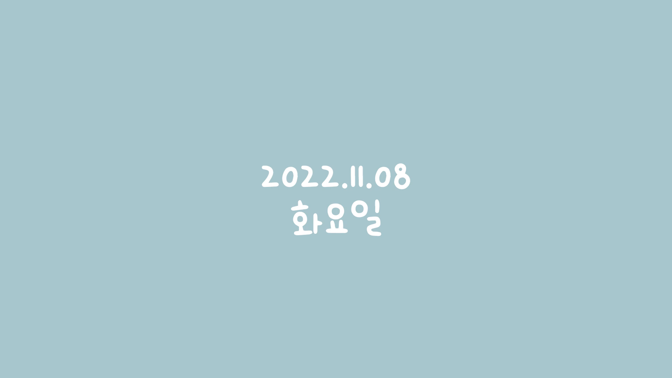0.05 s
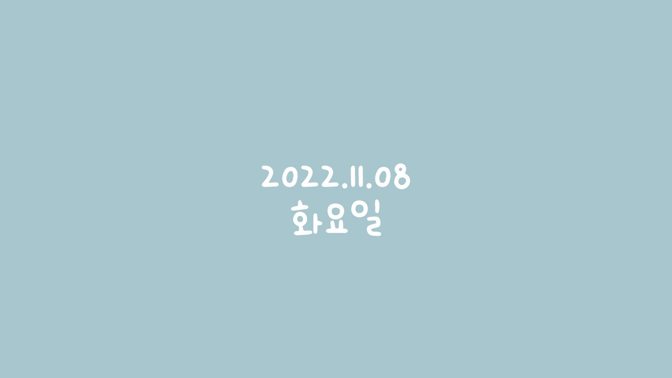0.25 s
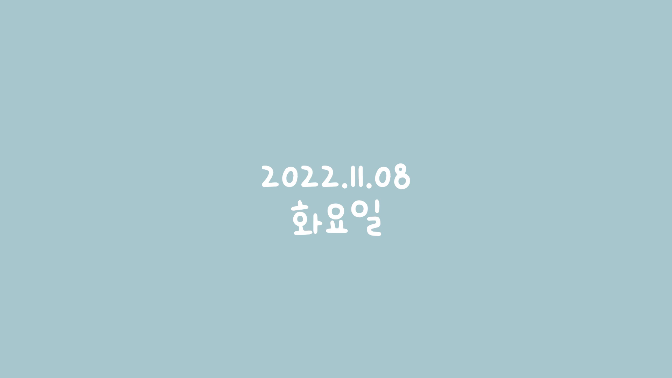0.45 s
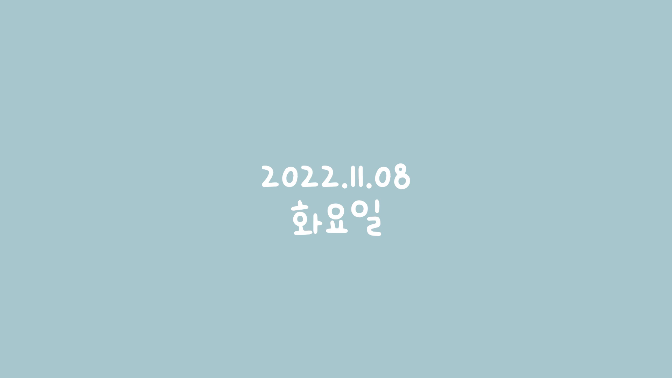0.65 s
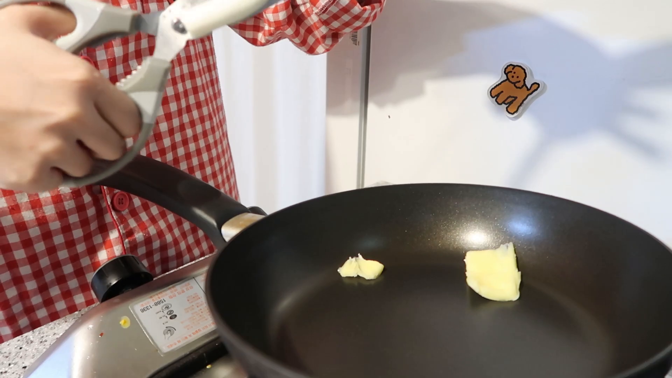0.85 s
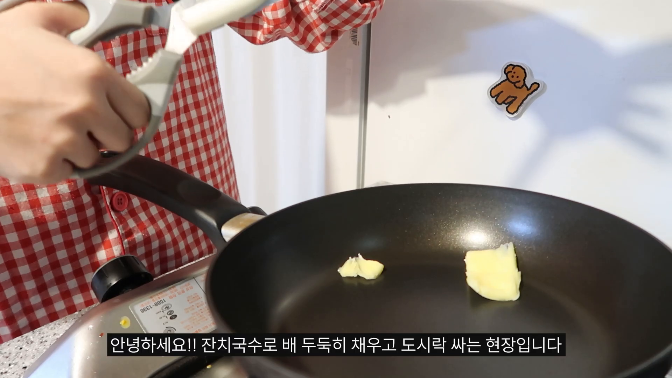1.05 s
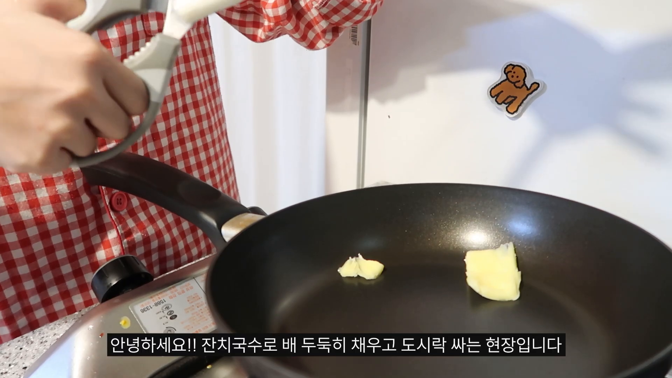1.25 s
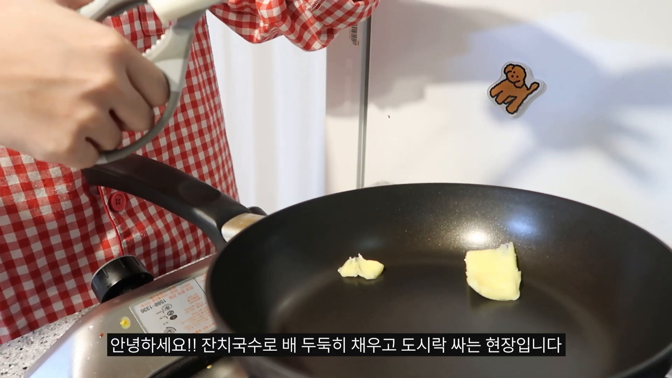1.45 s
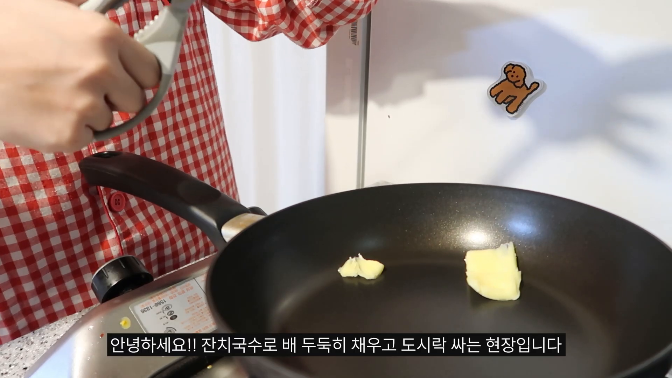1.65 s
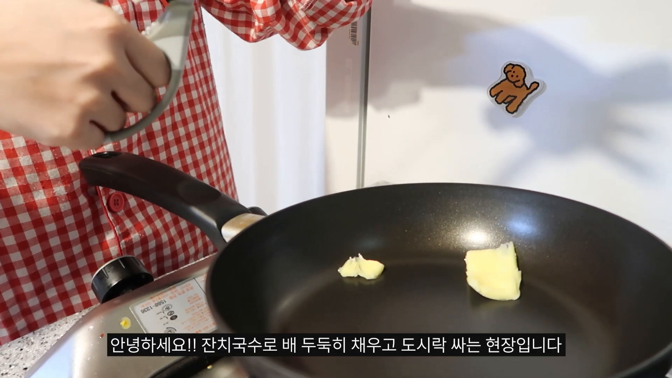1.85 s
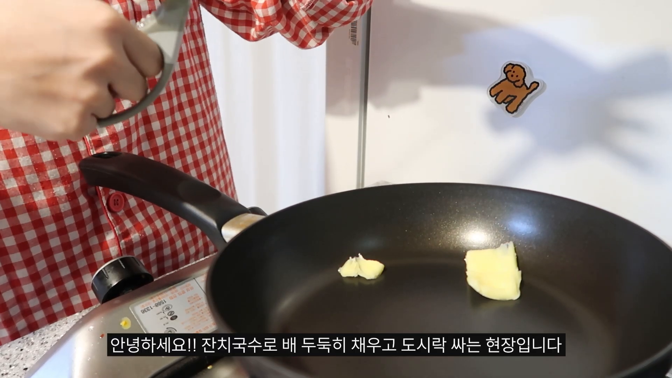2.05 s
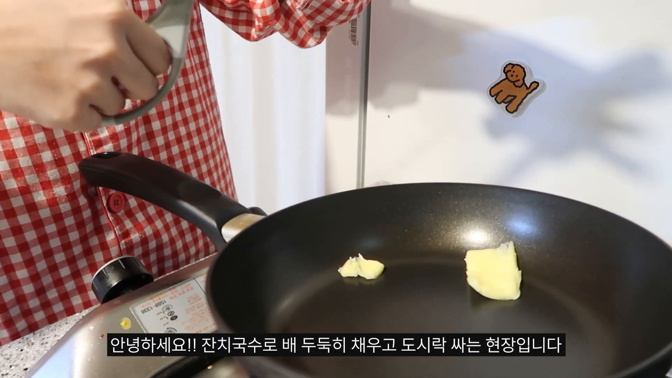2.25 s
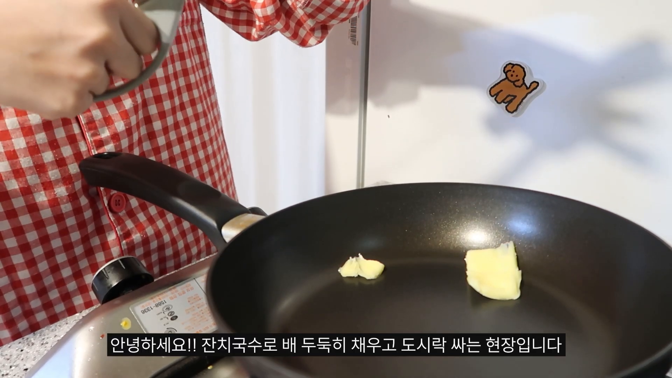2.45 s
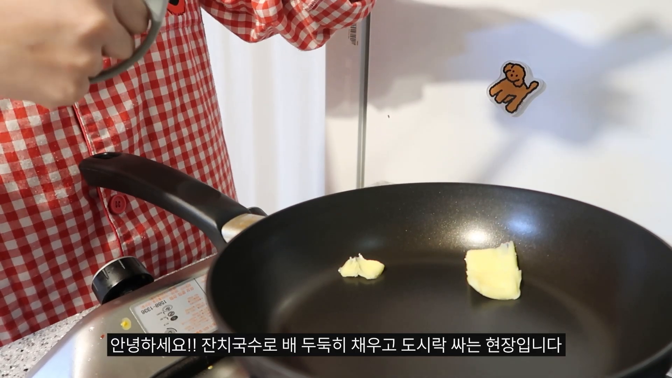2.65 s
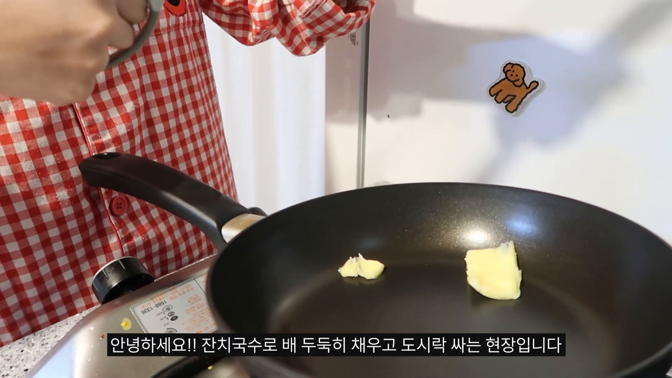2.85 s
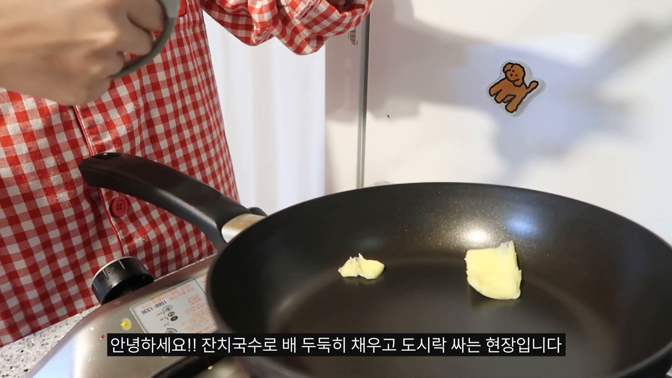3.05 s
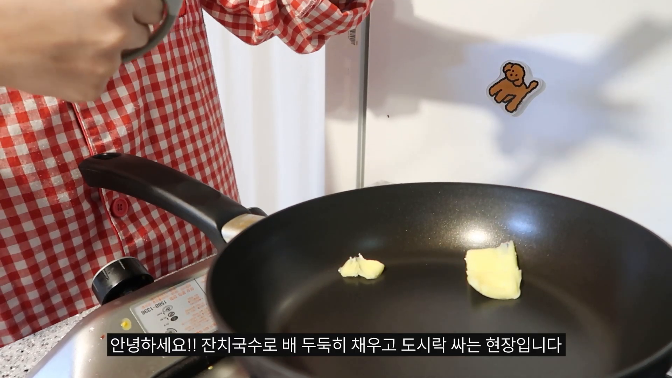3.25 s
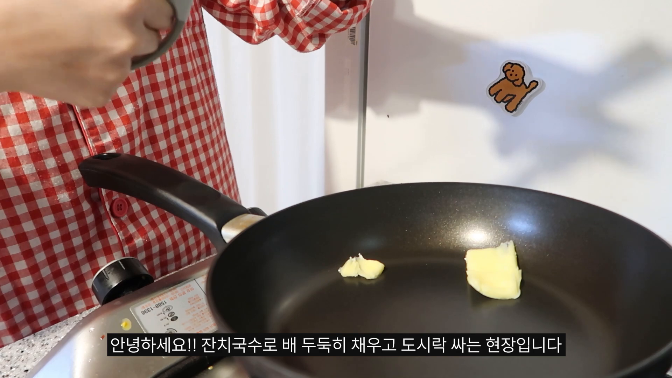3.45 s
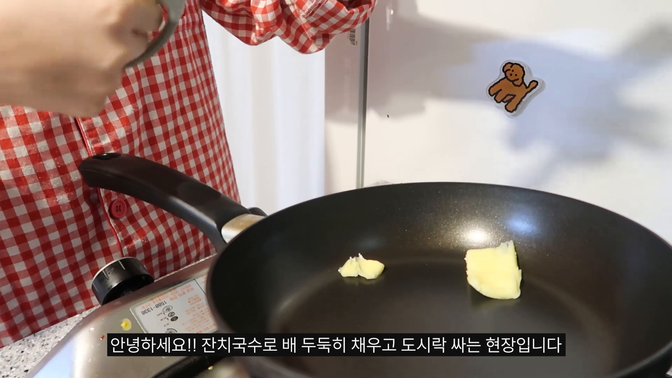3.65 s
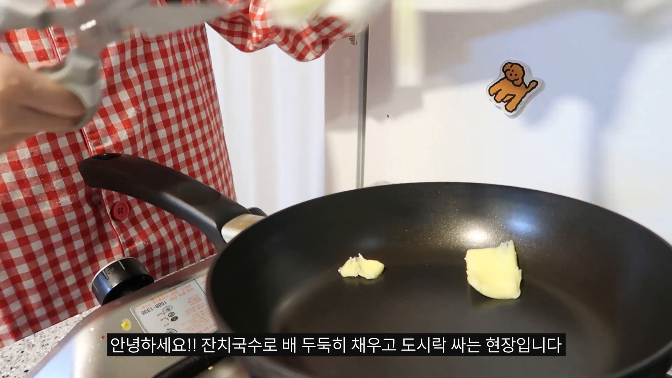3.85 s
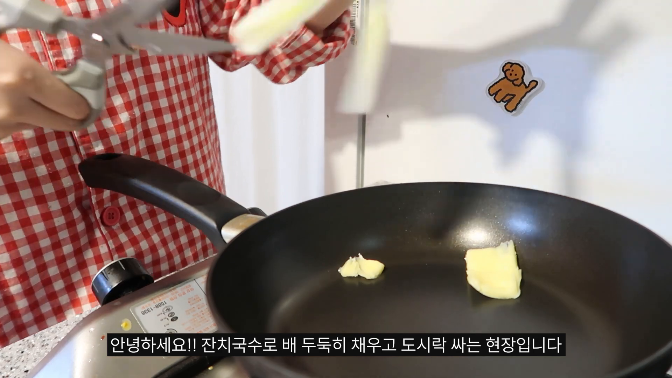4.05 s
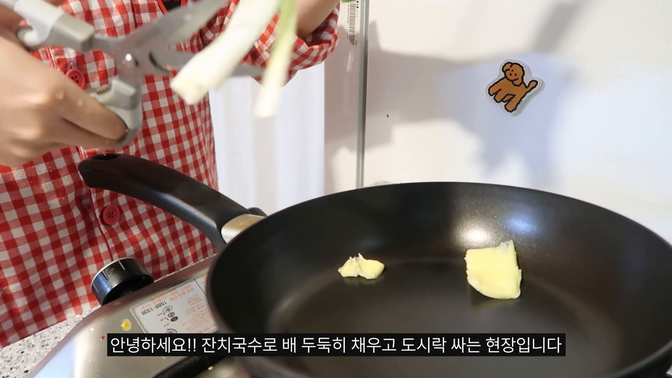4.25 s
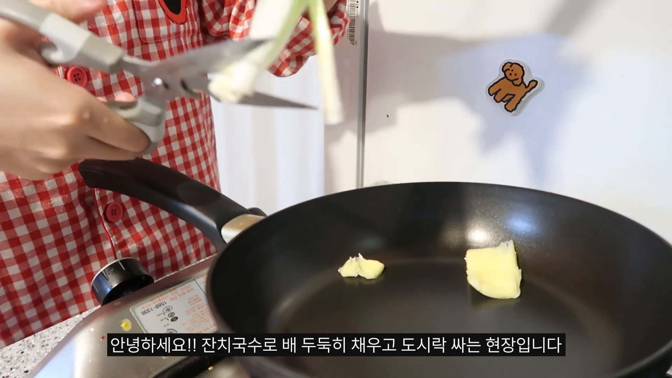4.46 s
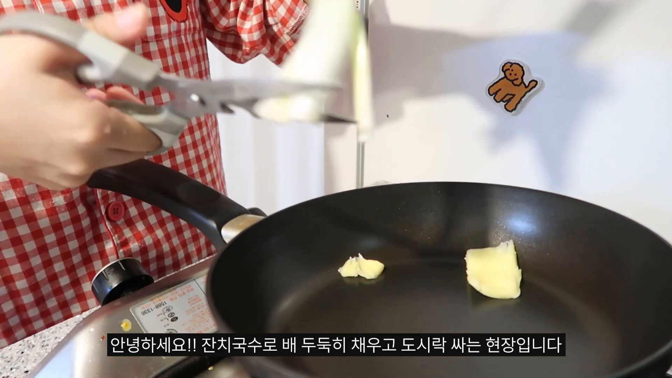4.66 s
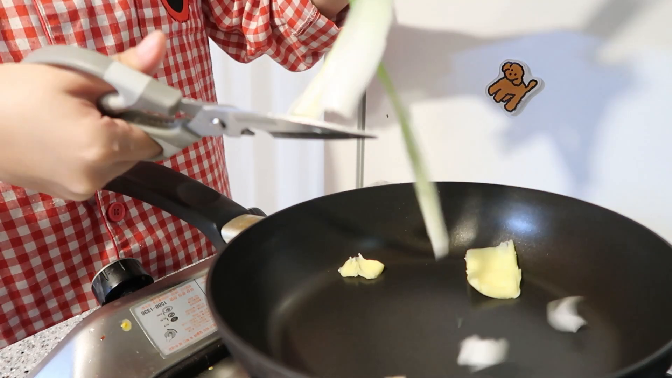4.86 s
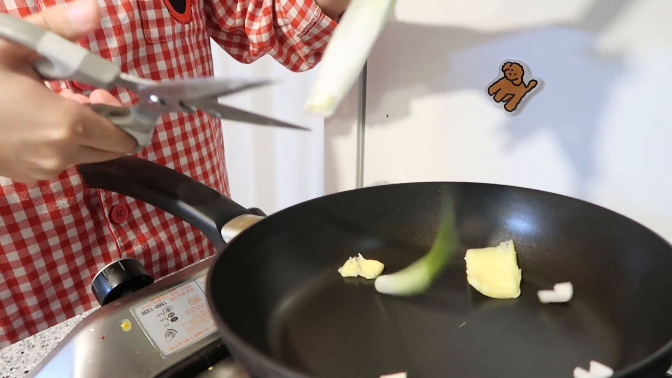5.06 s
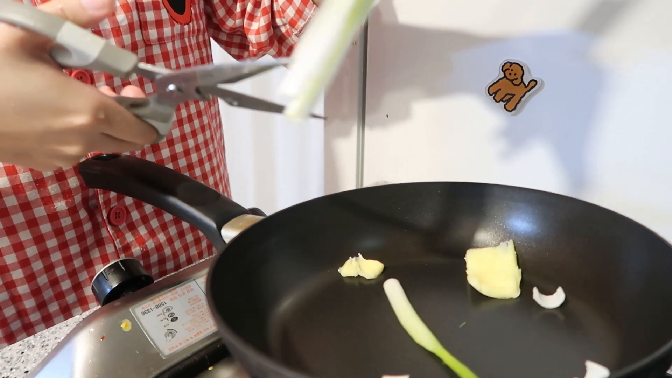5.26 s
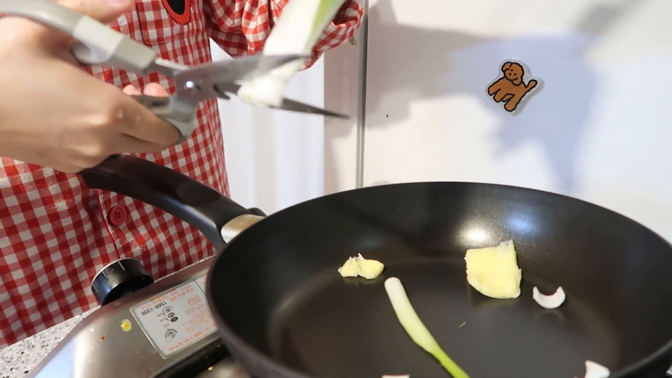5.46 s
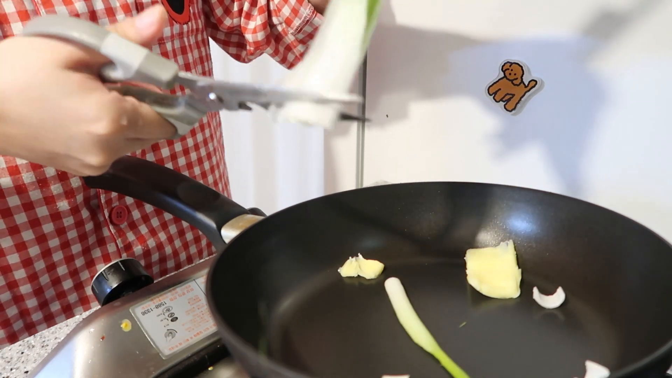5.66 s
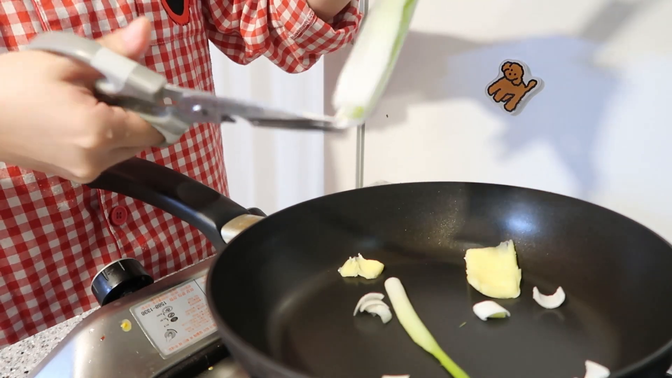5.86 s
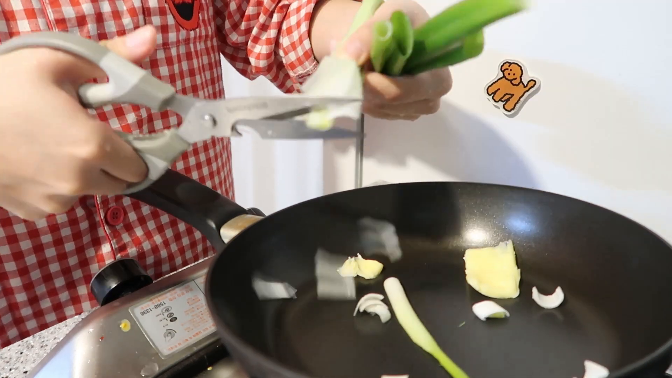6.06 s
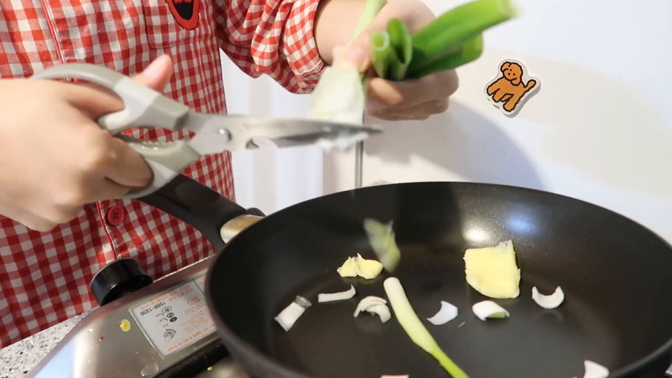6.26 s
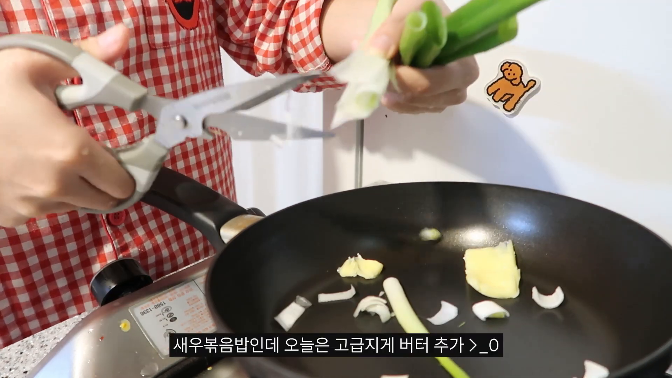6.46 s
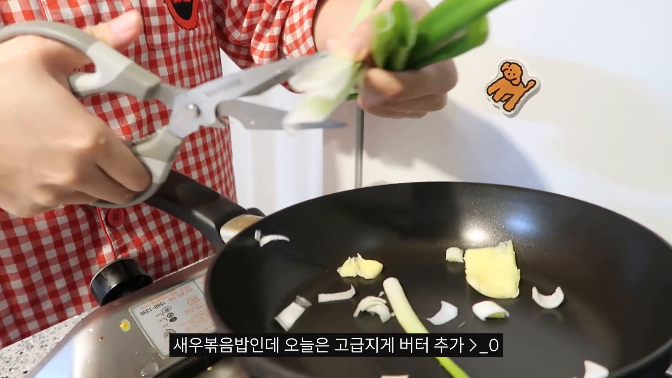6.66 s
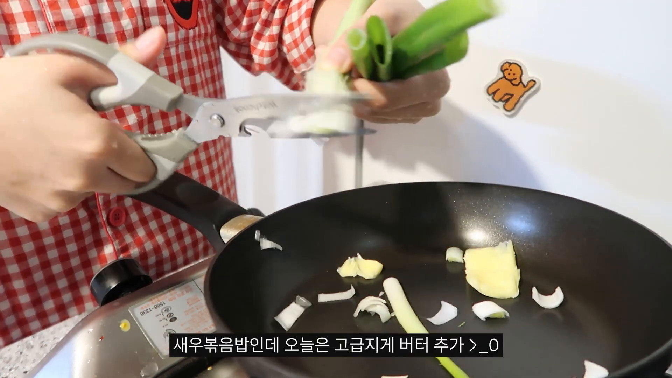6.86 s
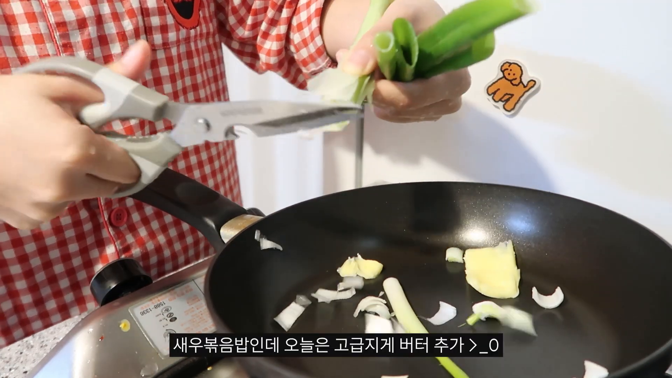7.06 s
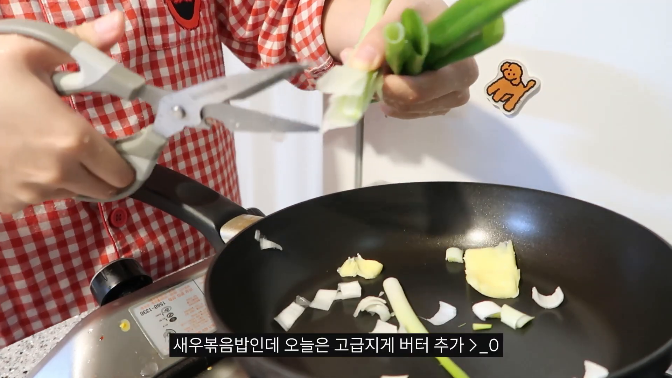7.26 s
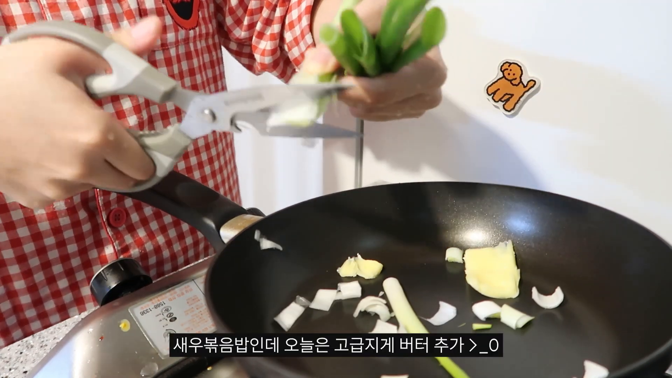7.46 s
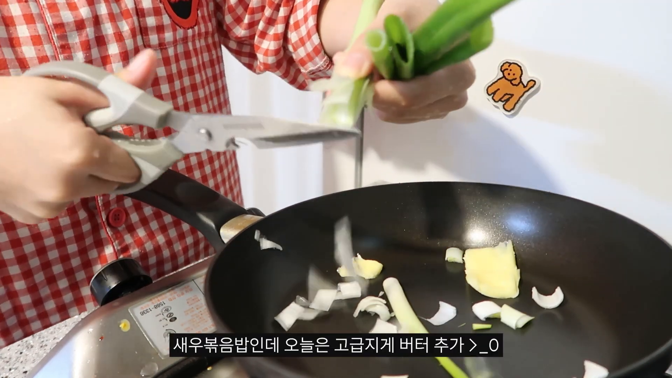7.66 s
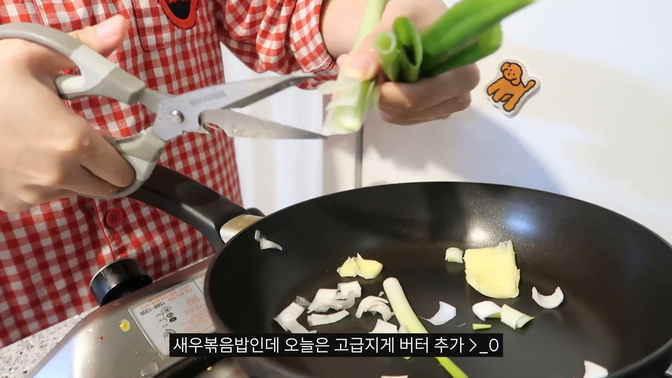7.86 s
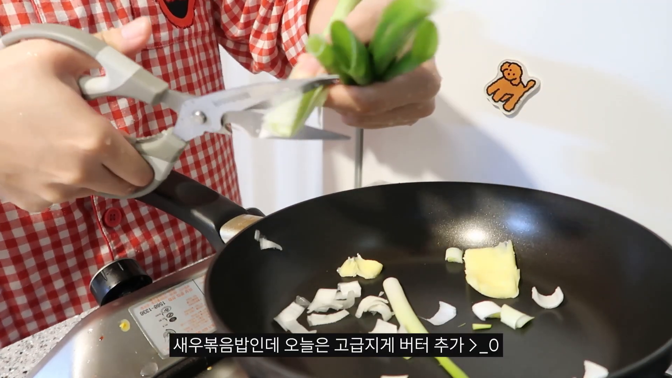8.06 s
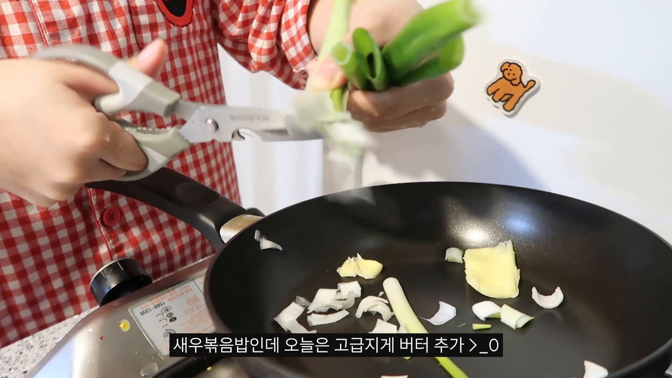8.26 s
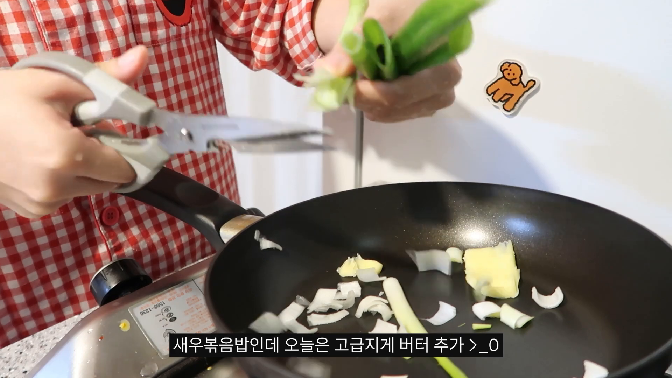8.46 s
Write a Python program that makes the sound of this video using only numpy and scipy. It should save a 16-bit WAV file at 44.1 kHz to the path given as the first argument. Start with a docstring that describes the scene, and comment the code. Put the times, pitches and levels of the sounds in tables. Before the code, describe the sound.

Silence until about 0.75 s, then a quiet kitchen fades in over a second: low rumble and very faint appliance whines. Scissors work close to a stereo microphone on fresh green onion. Short, wet, gritty crunches with sharp fibre snaps come at 1.2, 1.65, 2.1 and 2.5 s, with soft stalk rustles between them. A harder crunch runs from 3.3 s to a loud crack near 3.7 s. Light rustling and small ticks follow until a crisp snip at 4.8 s, its blades faintly ringing; pieces hit the frying pan around 5.0 s with a low, soft thump, and a smaller one at 5.35 s. More snips at 5.8, 6.35, 7.0, 7.65 and 8.35 s; bits tap and patter in the pan, notably at 5.9 and 7.15 s, more faintly at 7.8 and 8.5 s. Short, bright room reflections surround everything.

```python
"""Kitchen scissors cut green onion, heard at two close ports after an initial silence.
A low rumble and faint whines, shaped noise, fade in; stalks tear and rustle as dense trains of breaks,
and from 1.1 s fibres snap as short, noisy wave packets. From 4.9 s the closing blades hum as one mode
and the pieces land in a frying pan, whose modes ring, with thumps of low damped modes.
Decaying random taps add the kitchen's echo to onion, blades and pan."""
import sys
import numpy as np
from scipy import signal
from scipy.fft import rfft, irfft, next_fast_len
from scipy.io import wavfile
from scipy.ndimage import uniform_filter1d

SR = 44100
rng = np.random.default_rng(int(sys.argv[2]) if len(sys.argv) > 2 else 0)


def to_wav(sig):
    """Store sig (one row per channel, or 1-D mono) as 16-bit WAV at the path in sys.argv[1].

    Samples outside -1..1 are clipped; the rate is SR.
    """
    pcm = np.clip(np.atleast_2d(sig), -1, 1) * 32767
    pcm = np.round(pcm).astype(np.int16)
    wavfile.write(sys.argv[1], SR, pcm.T)  # frames by channels


N = 375291


def gain_of(db):
    """Logarithmic level: decibels to amplitude."""
    return 10 ** (np.asarray(db) / 20)


def evened(x):
    """Power normalisation: scales to rms 1."""
    return x / np.sqrt(np.mean(x ** 2) + 1e-20)


def read(points, hz):
    """Logarithmic pitch scale: interpolates a table along log frequency."""
    f, value = np.transpose(points)
    return np.interp(np.log(hz + 1), np.log(f + 1), value)


def add(mix, s, sound):
    """Superposition: mixes a sound in at s seconds, cut at the end of the mix."""
    part = mix[round(s * SR):][:len(sound)]
    part += sound[:len(part)]


def colour(x, points):
    """Minimum-phase filtering: a causal response with the spectrum of a table."""
    log_gain = np.log(gain_of(read(points, abs(np.fft.fftfreq(2048, 1 / SR)))))
    taps = np.fft.ifft(np.exp(np.conj(signal.hilbert(log_gain)))).real[:1024]
    return signal.oaconvolve(x, taps)[:len(x)]


def ring(hz, t60, t):
    """Damped oscillation: one mode falls 60 dB in t60 seconds."""
    return gain_of(-60 * t / t60) * np.sin(2 * np.pi * hz * t)


def cracks(per_s, spread_db):
    """Random point process: tiny breaks of either sign, a few of them large."""
    size = gain_of(spread_db * np.minimum(rng.exponential(1, N), 4)) * rng.choice([-1, 1], N)
    return size * (rng.random(N) < per_s / SR)


# Spectrum of the room's rumble: f/Hz, relative level/dB
RUMBLE = [(12, -49), (20, -27), (101, -0.5), (193, -9.5), (319, -8.5), (399, -11.5), (1480, -21),
          (2910, -23.5), (3440, -26), (13200, -38.5), (16000, -75)]
RUMBLE_DB = -43.5
# Appliances that whine: f/Hz, width between the -6 dB points/Hz, level/dB
WHINES = [(56.8, 16, -49.5), (99, 27, -53.5), (328, 12, -55.5), (820.3, 13, -59.5), (2837, 15, -61.5),
          (3910, 30, -63)]
WAVER_DB = 1.2  # rms, where the whines make up all the power
# Left-right correlation of the room tone: f/Hz, correlation (1 alike, negative opposed)
LIKENESS = [(110, 1), (200, 0.7), (950, 0.32), (3770, 0.17), (15000, -0.77)]


def room_tone():
    """Spectral synthesis of noise: random short-time spectra, with narrow humps for the appliances."""
    frames, hz = N // 1024 + 5, np.fft.rfftfreq(4096, 1 / SR)
    a, b, c, d, patches = rng.standard_normal((frames, len(hz), 5)).T
    patches = uniform_filter1d(uniform_filter1d(patches, size=40, axis=0), size=4, axis=1)
    patches = evened(patches)
    same = np.clip(read(LIKENESS, hz), -1, 1)[:, None]
    left = a + 1j * b
    right = same * left + np.sqrt(1 - same ** 2) * (c + 1j * d)
    spectra = np.array([left, right]) * gain_of(0.5 * patches)  # faint patches

    shapes = [(read(RUMBLE, hz), RUMBLE_DB)]
    shapes += [(-20 * np.log10(1 + (2 * (hz - f) / width) ** 2), db) for f, width, db in WHINES]
    # each shape is scaled to its own level before the powers add
    powers = [gain_of(2 * (shape + db)) / gain_of(2 * shape).sum() for shape, db in shapes]
    power = sum(powers)

    # the whines come and go
    whining = 1 - powers[0] / power
    waver = uniform_filter1d(rng.standard_normal((frames, 1)) + patches.T, size=12, axis=0)
    spectra *= gain_of(WAVER_DB * whining[:, None] * evened(waver).T)
    tone = signal.istft(spectra * np.sqrt(power)[:, None], nperseg=4096, noverlap=3072)[1][:, :N]
    return evened(tone) * np.sqrt(power.sum())


# Strokes through the stalks: start t/s, length/s, force at start/dB, force at end/dB,
# release of force/(dB/s), fizz of wet cells over the force/dB
STROKES = [(0.758, 0.011, -24, -33, 262, -11), (1.162, 0.052, -32.5, -31.5, 400, -6),
           (1.609, 0.0045, -34.5, -48, 550, -11), (1.656, 0.064, -35, -32.5, 376, -5.5),
           (2.074, 0.05, -35, -34.5, 302, -8.5), (2.293, 0.024, -51, -46, 250, -8),
           (2.49, 0.073, -29, -27, 450, -11), (2.904, 0.0038, -65, -46.5, 273, -11),
           (3.312, 0.036, -27, -23, 308, -13), (3.616, 0.071, -23, -15.5, 1785, -19.5),
           (4.758, 0.077, -36, -29.5, 220, -4), (5.728, 0.0026, -30.5, -32.5, 400, -1),
           (5.77, 0.022, -35, -32, 409, -9), (6.305, 0.012, -42.5, -35, 343, -4.5),
           (6.984, .004, -25.5, -31, 304, -6), (7.01, 0.015, -43, -22.5, 750, -9),
           (7.603, 0.038, -34, -26, 1000.5, -4.5), (8.344, 0.037, -26.5, -31.5, 700, -9)]
# Stalks rustling in the hand: t/s, level/dB
RUSTLE = [(.87, -69), (.97, -46.5), (1.08, -63), (1.315, -61), (1.423, -39.5), (1.556, -50.5), (1.82, -64),
          (1.9, -47), (2.21, -75), (2.4, -59), (2.48, -42.5), (2.62, -62), (2.87, -60.5), (3.05, -46),
          (3.263, -57.5), (3.55, -68), (4.2, -64), (4.33, -55.5), (4.64, -70), (5.6, -73), (6.2, -53),
          (6.5, -58.5), (6.6, -85), (6.76, -58), (6.9, -72.5), (8.2, -65), (8.322, -38), (8.4, -65)]
RUSTLE_FIZZ_DB = -8
ATTACK_DB_PER_S = 615  # for a force at end of -39 dB
HARD_SHARE = 0.27  # harder strokes set in faster: dB of attack rate per dB of force
BITE_DB, BITE_DB_PER_S, BITE_FIZZ_DB = -24, 154, 10  # the blades press in faintly before each stroke
SETTLE_DB, SETTLE_DB_PER_S = -22, 110  # the stalk creaks on after it
FIZZ_RISE, FIZZ_FALL = 1, 0.84  # slopes of the fizz as shares of those of the force
FIZZ_FADE_DB_PER_S = 21  # the fizz fades as the stroke goes on


def effort():
    """Envelope of a driven source: force and fizz in dB through bite, hold, release and settling."""
    t = np.arange(0, N / SR + .002, .001)
    start, length, first_db, last_db, release, fizz_db = np.transpose(STROKES)[:, :, None]
    early, late = np.maximum(start - t, 0), np.maximum(t - start - length, 0)
    progress = np.clip((t - start) / np.maximum(length, 1 / SR), 0, 1)
    hold_db = first_db + (last_db - first_db) * progress
    attack_db = ATTACK_DB_PER_S * gain_of(HARD_SHARE * (last_db + 39.0)) * early
    release_db = release * late
    fizz_loss_db = FIZZ_RISE * attack_db + FIZZ_FALL * release_db
    fizz_loss_db += FIZZ_FADE_DB_PER_S * np.maximum(t - start, 0)

    bite = gain_of(first_db + BITE_DB - BITE_DB_PER_S * early) * (t < start)
    settle = gain_of(last_db + SETTLE_DB - SETTLE_DB_PER_S * late) * (late > 0)
    rustle = gain_of(np.interp(t, *np.transpose(RUSTLE)))
    force = (gain_of(hold_db - attack_db - release_db) + bite + settle).sum(0) + rustle
    fizz = gain_of(fizz_db) * (gain_of(hold_db - fizz_loss_db) + gain_of(BITE_FIZZ_DB) * bite + settle)
    fizz = fizz.sum(0) + gain_of(RUSTLE_FIZZ_DB) * rustle
    return [np.interp(np.arange(N) / SR, t, 20 * np.log10(v)) for v in (force, fizz)]


# Thickness of the part in the hand, thin leaf to white stalk: t/s, thick layers over the force/dB
GIRTH = [(1.3, -25), (1.7, -11), (2.5, -8), (3.5, -13), (4.8, -8.5), (5.75, -9), (6.3, -4), (8.0, -9.5)]
# Spectrum of torn stalk: f/Hz, relative level/dB
TORN = [(1100, -62.5), (1900, -13.5), (2600, -6), (3400, -6), (5500, -9.5), (8000, -36)]
# Spectrum of bursting cells: f/Hz, relative level/dB
FIZZ = [(4500, -27.5), (6200, 1.5), (9000, -5.5), (13000, -7.5), (15700, -27.5)]
# Spectrum of thick layers: f/Hz, relative level/dB
THICK = [(300, -25), (600, -14), (1000, -15.5), (1500, -2.5), (2300, -32)]


def crunch():
    """Granular fracture: fibres break, each at one of 12 pitches; cells fizz above, thick layers thud below."""
    t = np.arange(N) / SR
    force_db, fizz_db = effort()
    girth_db = np.interp(t, *np.transpose(GIRTH))
    fibres, kind = cracks(per_s=2500, spread_db=2.5), rng.integers(0, 12, N)
    hard_db = np.maximum(force_db + 33.5, 0)
    grains = np.zeros(N)
    for k, hz in enumerate(np.geomspace(1300, 6000, num=12)):
        lean = gain_of(0.58 * hard_db * np.log2(3200 / hz))  # hard tears break thicker, lower fibres
        fibre = ring(hz, 16.0 / hz, t[:800]) * np.sqrt(hz)
        grains += signal.oaconvolve(fibres * lean * (kind == k), fibre)[:N]

    # cells burst all along the stalk, so each port hears partly its own
    cells = [evened(fibres) * 0.53 + evened(cracks(per_s=8000, spread_db=8.5)) for port in range(2)]
    strands = evened(cracks(per_s=350, spread_db=5.5))  # tough strands part one by one
    torn = evened(np.array([colour(evened(grains) + 0.095 * c + 1.07 * strands, TORN) for c in cells]))
    fizz = evened(np.array([colour(c, FIZZ) for c in cells]))
    thick = evened(colour(fibres, THICK))

    # the layers give way in fits and starts
    fits = uniform_filter1d(uniform_filter1d(rng.standard_normal(N), size=200), size=200)
    force_db = force_db + 2.0 * evened(fits)
    return gain_of(force_db) * (torn + gain_of(girth_db) * thick) + gain_of(fizz_db) * fizz


# Phase between the two ports: f/Hz, left lead/rad
PORTS = [(3200, 0), (6000, -1.0), (9200, -3.0), (12500, -3.2), (16000, -6.2)]


def ports(x):
    """Interaural-style phase difference: the treble phase turns apart at two microphone ports."""
    size = next_fast_len(N)
    turn = np.exp(.5j * read(PORTS, np.fft.rfftfreq(size, 1 / SR)))
    turned = irfft(rfft(x, size) * np.array([turn, 1 / turn]), size)[:, :N]
    return turned * gain_of([[-.3], [.3]])


# Echo of the kitchen: f/Hz, t60/s, energy level/dB
ECHO = [(300, 0.45, -7), (2410, 0.24, -10.5), (10900, 0.038, 3.5)]


def kitchen(x):
    """Statistical reverberation: sparse random taps, each band dying at its own speed."""
    taps = np.zeros((2, SR // 2))
    at = np.arange(60, SR // 2 - 16, 16)
    at = at + rng.integers(0, 16, (2, len(at)))  # one tap in every 16 samples
    np.put_along_axis(taps, at, rng.choice([-1., 1.], at.shape), 1)
    hz, t, z = signal.stft(taps, SR, nperseg=256)
    # long waves reach both ports alike
    alike = np.clip(read([(1000, 1.0), (3500, 0.67), (8000, 0.03)], hz), 0, 1)[:, None]
    z[1] = alike * z[0] + np.sqrt(1 - alike ** 2) * z[1]
    t60, db = (read(np.array(ECHO)[:, [0, k]], hz)[:, None] for k in (1, 2))
    # each band carries the energy of its row, however long it rings
    per_energy = np.sqrt(16 * 6 * np.log(10) / (t60 * SR))
    tail = signal.istft(z * gain_of(db - 60 * t / t60) * per_energy, SR, nperseg=256)[1]
    return signal.fftconvolve(x[None], tail, axes=1)[:, :N]


# Fibres that snap and blades that click: t/s, level/dB, f/Hz,
# treble over that level/dB (before a common 9 dB lift)
SNAPS = [(1.1025, -28, 4300, -16), (1.1613, -20, 4100, -27), (1.184, -16.5, 4140, -26),
         (1.2111, -17, 3500, -22), (1.261, -26, 3880, -26), (1.657, -24.5, 1670, -22),
         (2.4941, -19, 2920, -16), (2.5264, -16, 3400, -21), (2.5581, -18, 3300, -27),
         (2.5709, -18.5, 3660, -19), (2.7461, -24, 1530, -47), (2.912, -31.5, 2900, -15),
         (3.2892, -29.5, 3200, -16), (3.3276, -18, 2670, -22), (3.3381, -18.5, 2730, -24),
         (3.597, -46, 3320, -9), (3.6373, -21, 2240, -17), (3.6417, -14, 2900, -33),
         (3.6655, -20, 2940, -26), (3.6686, -15, 2600, -29), (3.6909, -9, 2810, -21.5),
         (3.692, -29, 630, -40), (3.7908, -28.5, 2750, -24), (4.222, -29, 2470, -47),
         (4.31, -30, 3450, -28), (4.5266, -40, 5000, -11.5), (4.66, -29.5, 3930, -19),
         (4.71, -33.5, 1660, -25.5), (4.7316, -29.5, 7160, -2.5), (4.759, -38, 3230, 0.5),
         (4.7896, -30, 3200, -4.5), (4.8073, -27, 3200, -15), (4.8278, -24, 3230, -30),
         (4.837, -27, 3100, -30), (4.8763, -11, 2930, -22), (5.2381, -30.5, 1700, -23.5),
         (5.3392, -28, 1740, -31), (5.71, -21.5, 2400, -24), (5.7172, -17.5, 2670, -19),
         (5.778, -28, 2600, -7), (5.7848, -20, 2480, -19), (5.7995, -22, 2280, -14),
         (5.826, -16, 2540, -41), (6.0498, -37.5, 2410, -30), (6.126, -40, 4160, -11),
         (6.351, -16.5, 2620, -29), (6.762, -34.5, 1730, -30), (6.9774, -30, 3270, -22),
         (7.0241, -15.5, 3400, -17), (7.0429, -22, 3340, -27), (7.6499, -17.5, 1910, -11),
         (7.6744, -19.5, 2700, -26), (8.343, -18.5, 1700, -16), (8.3583, -26, 3100, -13),
         (8.3647, -16.5, 2170, -21), (8.4015, -22.5, 3200, -23.5)]
CRACK_S = .0004  # from the start of a snap to the centre of its sharp cycle


def snaps():
    """Impulsive fracture: one sharp cycle, a few more at its pitch, noisy splinters and a treble tick."""
    t, out = np.arange(1200) / SR, np.zeros(N)
    noise = rng.standard_normal((len(SNAPS), 2, len(t)))
    brief, puff = gain_of(-60 * t / .006), gain_of(-60 * t / .03)
    for (s, db, hz, treble_db), (low, high) in zip(SNAPS, noise):
        body = ring(hz, 0.013, t) + 0.3 * ring(hz * 1.39, 0.0084, t)
        from_peak = t - CRACK_S
        crack = 1.87 * np.cos(2 * np.pi * hz * from_peak) * np.exp(-(from_peak * hz / 0.52) ** 2)
        splinters = 0.84 * evened(np.convolve(low, body)[:len(t)]) * puff
        splinters += 0.54 * evened(colour(low, TORN)) * puff
        tick = gain_of(treble_db + 9.0) * evened(colour(high, FIZZ)) * (brief + 0.71 * puff)
        add(out, s, gain_of(db) * (crack + 0.5 * body + splinters + tick))
    return out


# The blades meet: t/s, level/dB
SHUTS = [(4.878, -40), (5.827, -41), (6.352, -40.5), (7.046, -37), (7.676, -42)]
BLADE_HZ, BLADE_T60_S = 2220, 0.47


def blades():
    """Noise-modulated resonance: the meeting blades hum at one mode, with random unevenness."""
    t, out = np.arange(SR // 3) / SR, np.zeros(N)
    for s, db in SHUTS:
        rough = evened(uniform_filter1d(rng.standard_normal(len(t)), size=300))
        add(out, s, gain_of(db) * ring(BLADE_HZ, BLADE_T60_S, t) * (1 + 0.54 * rough))
    return out


# Pieces that land in the pan: t/s, level/dB, hardness/(dB/octave),
# level of the rim modes/dB (high near the wall of the pan)
DROPS = [(4.956, -36, -3.5, 5), (4.9747, -30, 3.5, -9), (5.048, -28.5, -2, -17), (5.3523, -39, -3.5, -8),
         (5.8911, -21, -3.5, -15), (5.8974, -29, 3, 1), (5.9093, -34, -1, 3), (6.2017, -52.5, 36, -21),
         (6.295, -40, -5.5, -1), (7.1279, -27.5, -5.5, -3), (7.1467, -33.5, 4, -3), (7.1533, -20.5, 8, -6),
         (7.158, -36, 8, 7), (7.163, -30.5, 5, -7), (7.1745, -36.5, 12, -18), (7.289, -41.5, 1.5, -14),
         (7.7826, -32, 15.5, 1), (7.793, -37.5, 0, 5), (7.8099, -42.5, 13.5, -1), (8.4903, -33.5, -11, -4)]
# Modes of the pan, before each landing detunes and damps them: f/Hz, level/dB, t60/s
PAN = [(972, 7, 0.046), (1006, -7, 0.14), (1635, 2.5, 0.049), (1414, -6, 0.025), (2170, -8.5, 0.093),
       (1880, -2, 0.044), (2682, -6.5, 0.066), (2640, 6.5, 0.068), (3160, -15, 0.07), (3790, 2, 0.12),
       (4140, 0, 0.065), (5427, 6, 0.07), (7080, 2, 0.048)]
CENTRE_HZ, RIM_HZ = 1650, (3400, 4600)
ROLL_OFF_DB = 8.5  # per octave squared, away from the centre


def pan():
    """Modal excitation: a soft piece lands, then slithers in a dying patter; both ring the modes."""
    t, out = np.arange(SR // 3) / SR, np.zeros(N)
    hz, mode_db, t60 = np.transpose(PAN)
    octaves, rim = np.log2(hz / CENTRE_HZ), (hz > RIM_HZ[0]) & (hz < RIM_HZ[1])
    chance = rng.standard_normal((len(DROPS), len(PAN) + 1500))
    for (s, db, hardness_db, rim_db), draw in zip(DROPS, chance):
        spot_db = db + hardness_db * np.minimum(octaves, 1) + rim_db * rim
        spot_db -= ROLL_OFF_DB * np.minimum(octaves, 1.7) ** 2
        size = gain_of(mode_db + spot_db + 0.33 * draw[:len(PAN)])
        detuned = hz * (1 + 0.0034 * draw[:len(PAN)])  # each landing rings at slightly random pitches
        modes = size @ ring(detuned[:, None], t60[:, None], t) * (1 - np.exp(-t / 0.00047))
        # the piece settles and damps the metal
        modes *= 0.22 + 1.2 * np.exp(-t / 0.012)
        patter = draw[-1500:] * gain_of(-60 * t[:1500] / 0.073)
        sound = modes + 0.078 * signal.fftconvolve(modes, patter)[:len(t)]
        sound[:1500] += 1.0 * size.max() * colour(patter, TORN)
        sound[:1500] += 2.8 * gain_of(spot_db[-1]) * colour(patter, FIZZ)
        sound[:1500] += 2.4 * size[0] * colour(patter, THICK)  # the soft flesh thuds
        add(out, s, sound)
    return out


# Low modes of the thumps in the pan, a close pair near 100 Hz beating: t/s, level/dB, f/Hz, t60/s
THUMPS = [(5.053, -20.5, 257, 0.059), (5.065, -29, 98.6, 0.94), (5.089, -38, 106, 0.55),
          (5.355, -27.5, 238, 0.045)]


def thumps():
    """Low-frequency modal response: each row is one damped mode with a dull noise thud."""
    t, out = np.arange(SR) / SR, np.zeros(N)
    for s, db, hz, t60 in THUMPS:
        dull = signal.lfilter(*signal.butter(2, 800, fs=SR), rng.standard_normal(SR))
        thud = 0.52 * evened(dull) * gain_of(-60 * t / 0.076)
        onset = 1 - np.exp(-t * hz / 0.21)
        add(out, s, gain_of(db) * (ring(hz, t60, t) + thud) * onset)
    return out


def scene():
    """Superposition of fields: onion, blades and pan, direct and off the walls, over the room tone."""
    near = crunch() + snaps() + blades() + pan() + thumps()
    return ports(near) + kitchen(near.mean(0)) + room_tone()


# Fade-in of the whole sound, silent before the first row: t/s, gain/dB
FADE = [(.755, -26.5), (1.1, -11.5), (1.4, -8), (1.9, -6)]
EDGE_HZ = 15900


def record(dry):
    """Gain control and band limiting: silence, a fade-in, then a low-pass filter."""
    t, (s, db) = np.arange(N) / SR, np.transpose(FADE)
    faded = dry * gain_of(np.interp(t, s, db)) * np.clip((t - s[0]) / 0.061, 0, 1)
    low_pass = signal.firwin(511, EDGE_HZ, window=("kaiser", 9), fs=SR)
    return signal.oaconvolve(faded, low_pass[None], "same")


dry = scene()
out = record(dry)
to_wav(out)
```